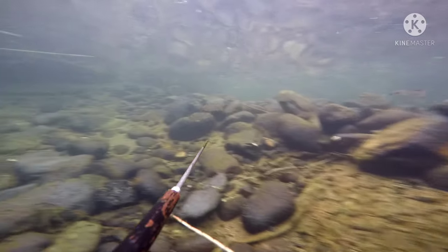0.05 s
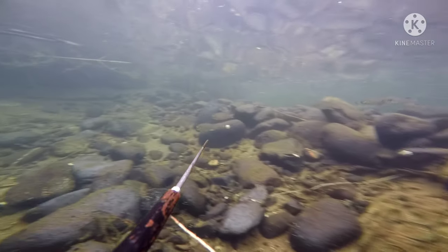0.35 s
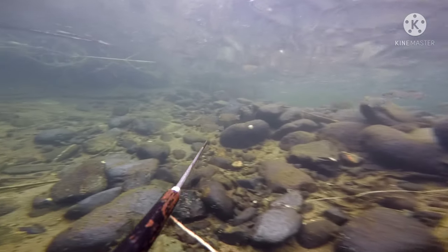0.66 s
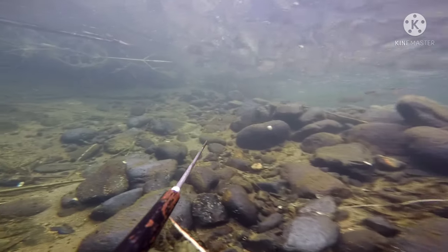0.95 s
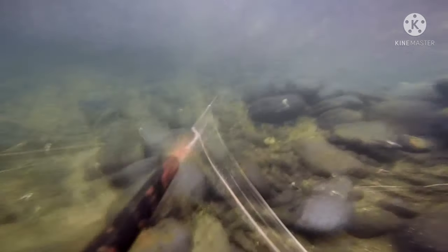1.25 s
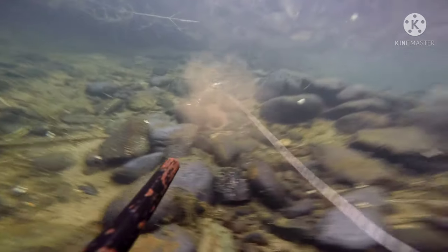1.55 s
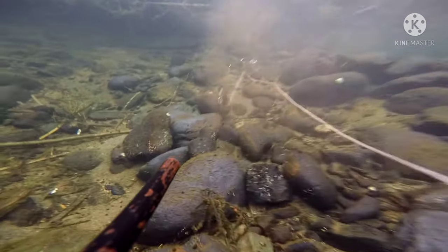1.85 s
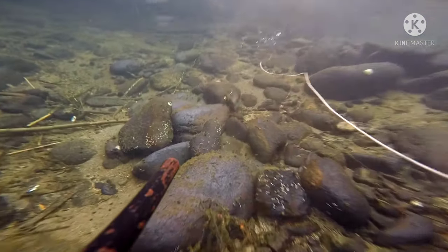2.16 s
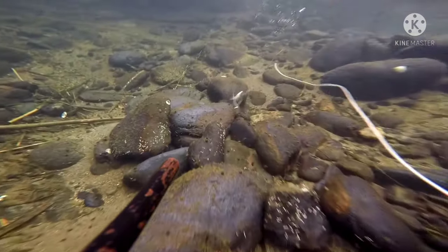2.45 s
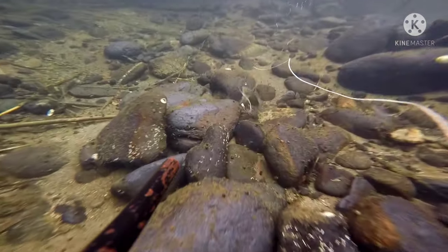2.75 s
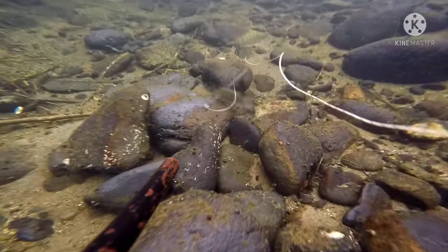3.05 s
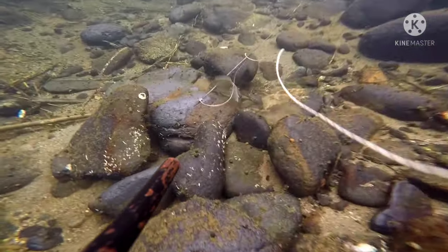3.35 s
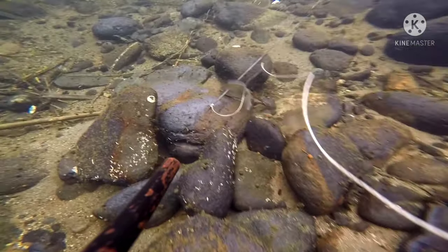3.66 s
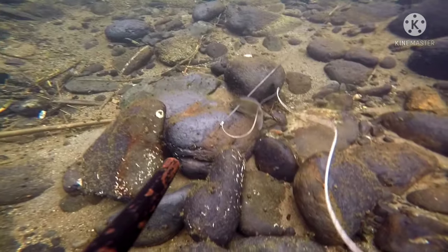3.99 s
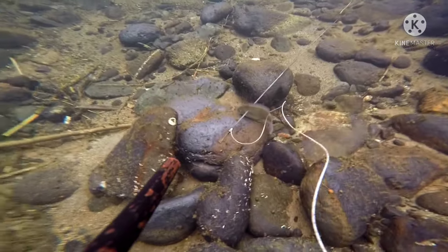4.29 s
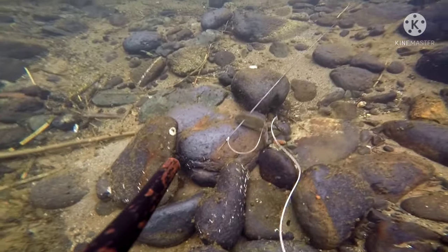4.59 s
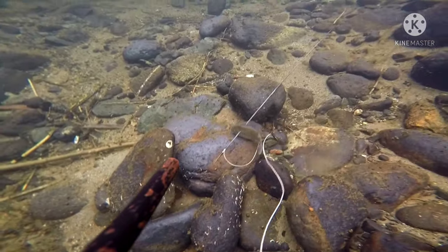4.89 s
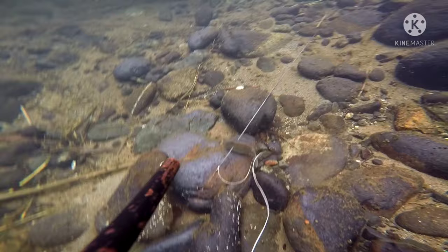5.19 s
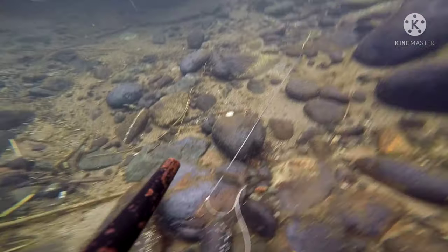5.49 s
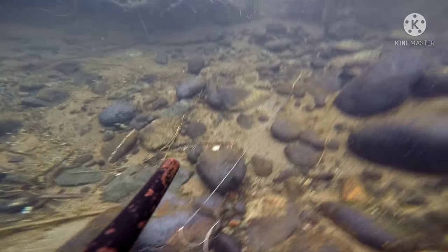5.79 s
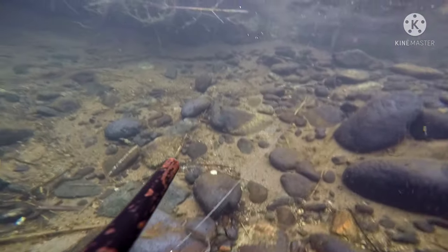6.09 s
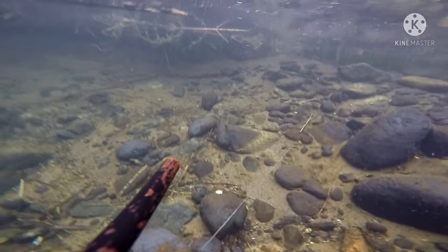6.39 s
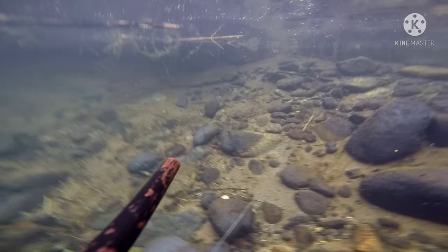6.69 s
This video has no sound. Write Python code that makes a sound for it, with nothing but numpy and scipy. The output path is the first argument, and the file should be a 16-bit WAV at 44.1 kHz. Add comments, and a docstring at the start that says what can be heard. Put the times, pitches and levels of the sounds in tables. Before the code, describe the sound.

A low, lumpy rumble of river current is heard underwater through a housing fixed to a speargun. After a couple of faint ticks, the gun fires with a hard, distorted snap, a heavy kick and a brief low hum. Everything is ducked for a moment. As the water noise swells back, the line taps and drags on the gun, then the knocks thin out among light scratches of grit and sharp little clicks.

```python
"""A speargun fires in a shallow stony river: a burst of hard blows, a heavy kick and a low hum.
Heard through the housing of a camera on the gun, the shot overloads and the gain control ducks
everything, then slowly recovers. The gun sways, the line knocks and drags on it, grit scrapes the
shaft and a few small hard ticks sound in the water. Under it all the current rumbles on the housing."""
import sys
import numpy as np
from scipy import signal
from scipy.fft import rfft, irfft
from scipy.io import wavfile

SR = 44100
rng = np.random.default_rng(int(sys.argv[2]) if len(sys.argv) > 2 else 0)


def file_out(sig):
    """Save sig as 16-bit WAV at sys.argv[1]."""
    # one column per channel
    cols = np.atleast_2d(sig).T
    # limit, then scale
    lim = np.clip(cols, -1, 1)
    pcm = np.round(lim * 32767).astype(np.int16)
    wavfile.write(sys.argv[1], SR, pcm)


N = 301644
TIME = np.arange(N) / SR
SHOT_S, CUTOFF_HZ = 1.333, 15400


# hits of the release, shaft, rubber bands and line running out:
# (time [s], knock peak [dB], ring peak [dB], drag time [s], knock centre [Hz])
SHOT_HITS = [(1.333, 23.5, 26.6, 0.00097, 660), (1.3338, 35, 27.4, 0.0013, 660),
             (1.3447, 13.5, 27, .0006, 687), (1.3535, 8, 32, .0003, 667), (1.3558, 32, 18.5, 0.0075, 615),
             (1.369, 6.5, 31, 0.0033, 650), (1.374, 14, 34.8, 0.0084, 647), (1.381, 24.5, 21, 0.0052, 650),
             (1.428, -8, 2, 0.00083, 680)]

def shot():
    """The gun fires: a tight cluster of choked hits over the kick and its hum."""
    return recoil() + hum() + contacts(SHOT_HITS, knock_damping=8, ring_damping=10.2,
                                       slip_db=2, grit_db=-9, slips_per_s=7000)


def recoil(level_db=36, start_hz=46, end_hz=22, settle_s=0.04, t60=0.39, rise_s=0.0045):
    """The kick shakes the gun heavily: a sub thump that drops in pitch as it dies."""
    t = np.maximum(TIME - SHOT_S, 0)
    cycles = end_hz * t + (start_hz - end_hz) * settle_s * (1 - np.exp(-t / settle_s))
    swell = 1 - np.exp(-(t / rise_s) ** 2)   # the gun's mass moves only after the first crack
    return from_db(level_db) * swell * np.sin(2 * np.pi * cycles) * from_db(-60 * t / t60)


# low hum of gun and slack bands, thin zing of the shaft: (pitch [Hz], level [dB], t60 [s])
HUM_MODES = [(70, 10, 0.6), (94.6, 14.5, 0.33), (133.4, -3.5, 0.2), (180, 7, 0.37), (7200, -1.5, 0.2)]

def hum():
    """The kick leaves the gun, its bands and the shaft ringing."""
    kick = np.zeros(N)
    kick[round(SHOT_S * SR)] = 1
    return body(kick, HUM_MODES, spread_db=1.5)


# the housing's low knock: (pitch [Hz], relative level [dB], t60 before damping [s])
HOUSING_MODES = [(302, -14, 0.086), (500, -8.5, .04), (591, -2.5, 0.052), (665, 0, 0.08),
                 (754, -2.5, 0.033), (867, -1.5, .03), (913, -1.5, 0.038), (1010, -7, 0.026)]
# the bright ring of gun and shaft: (pitch [Hz], relative level [dB], t60 before damping [s])
GUN_MODES = [(1520, -13, 0.009), (1476, -8, 0.051), (1815, -10.5, 0.082), (1921, -12, 0.18),
             (2160, -4, 0.057), (2480, -6, 0.072), (2435, 2.5, 0.062), (2720, 0, 0.036), (2980, 4.5, 0.048),
             (3220, -15, 0.036), (3600, -14, 0.034), (4097, -10, 0.094), (4590, -10, 0.054),
             (4874, -20, 0.1), (5420, -17, 0.092), (7800, -28, .06), (8300, -17.5, 0.051),
             (9300, -23.5, 0.024)]

def contacts(hits, knock_damping, ring_damping, slip_db, grit_db, slips_per_s, detune=.012):
    """Each hit is a blow trailed by tiny dying slips; it sounds both housing and gun."""
    out, t = np.zeros(N), TIME[:SR // 4]
    for start, knock_db, ring_db, drag_s, centre_hz in hits:
        force = from_db(slip_db) * grains(len(t), slips_per_s) * np.exp(-t / drag_s)
        force[0] = 1   # the blow itself
        # where it lands favours the low modes near its centre; the grip detunes the high ones a little
        low_modes = [(hz, db - 95 * np.log2(hz / centre_hz) ** 2, t60) for hz, db, t60 in HOUSING_MODES]
        high_modes = [(hz * (1 + detune * rng.standard_normal()), db, t60) for hz, db, t60 in GUN_MODES]
        knock = peak_one(cut(body(force, low_modes, knock_damping), centre_hz / 2, "high"))
        ringing = peak_one(body(force, high_modes, ring_damping))
        grit = from_db(grit_db) * peak_one(cut(force, 1500, "high"))
        add(out, start, from_db(knock_db) * knock + from_db(ring_db) * peak_one(ringing + grit))
    return out


# line and fittings knocking on the gun:
# (time [s], knock peak [dB], ring peak [dB], drag time [s], knock centre [Hz])
LINE_HITS = [(1.144, -43, -33.5, .008, 810), (1.1983, -29, -30.5, .005, 895), (1.457, -11, -7, .014, 703),
             (1.529, 3.5, -7.5, 0.0098, 690), (1.578, -10, -12.5, 0.028, 660), (1.632, -7, -25, .014, 355),
             (1.673, -8, -10.5, .006, 900), (1.726, -11.5, -13.5, 0.014, 930), (1.91, -15, -18, 0.03, 682),
             (1.972, -12, -20.5, 0.029, 708), (2.05, -26, -46, .008, 500),
             (2.095, -28.5, -27.5, 0.014, 720), (2.2295, -26, -17.5, 0.026, 663),
             (2.3445, -15, -17, .016, 666), (2.372, -12, -38, 0.011, 690), (2.4085, -4, -8.5, 0.0027, 823),
             (2.468, -16.5, -23.5, 0.031, 696), (2.588, -22, -22.5, 0.029, 696),
             (2.7215, -13, -15.5, .0067, 686), (2.734, -5.5, -12.5, 0.017, 664),
             (2.776, -11, -15.5, 0.026, 724), (2.923, -18, -31, .006, 710), (2.996, -17, -21.5, 0.017, 690),
             (3.033, -16, -20, 0.009, 680), (3.107, -15, -23.5, 0.0051, 700), (4.332, -35, -51, .003, 665),
             (4.5175, -22, -33, .019, 690), (4.9215, -24, -38, .0063, 710),
             (5.2965, -13.5, -45, .0037, 627), (5.3105, -7, -27.5, 0.0021, 646),
             (5.526, -14.5, -25, 0.011, 660), (5.564, -16, -26, 0.0022, 730), (6.76, -19, -49, .014, 328),
             (6.806, -18, -42, .0097, 573)]

def line_knocks():
    """The line and its fittings strike the gun and let it ring openly."""
    return contacts(LINE_HITS + rebounds(LINE_HITS), knock_damping=1.1, ring_damping=1.1,
                    slip_db=-12, grit_db=-5, slips_per_s=2400)


def rebounds(hits, delay_s=0.053, jitter=.25, softer_db=14, touch_drag_s=0.021):
    """The slack line falls back once after each hit: a faint touch, stronger after a long drag."""
    delays = delay_s * np.exp(jitter * rng.standard_normal(len(hits)))
    touches = []
    for (start, knock_db, ring_db, drag_s, centre_hz), delay in zip(hits, delays):
        loss_db = softer_db - 10 * np.log10(drag_s / touch_drag_s)
        touches.append((start + drag_s + delay, knock_db - loss_db, ring_db - loss_db,
                        touch_drag_s, centre_hz))
    return touches


# line and hand sliding along the gun:
# (time [s], length [s], level [dB], fade [dB/s], housing ring against the rasp [dB])
SLIDES = [(1.394, 0.394, -25.5, 49, 13.5), (2.218, 0.28, -48.5, 7, 18), (2.72, 0.18, -45, 48, 5),
          (2.984, 0.23, -44, 28, 8), (5.516, 0.176, -53.5, 24, 14), (6.691, 0.13, -42.5, 5, 1)]

def rubbing(friction_db=3, band_hz=(650, 2900), attack_s=0.014, release_s=0.042, uneven_db=2.5):
    """Grainy, uneven friction rasps and keeps the modes sounding; each slide bites, fades and lets go."""
    friction = cut(grains(N, per_s=2500), band_hz[1], "low", order=6)
    friction = cut(friction, band_hz[0], "high")
    gun_ring = rms_one(body(friction, GUN_MODES, damping=1.9, spread_db=0))
    rasp = gun_ring + from_db(friction_db) * rms_one(friction)
    housing_ring = rms_one(body(friction, HOUSING_MODES, damping=1.2, spread_db=4))
    out = np.zeros(N)
    for start, length, db, fade_db_per_s, housing_db in SLIDES:
        t = TIME - start
        stroke = np.clip(np.minimum(t / attack_s, 1 + (length - t) / release_s), 0, 1)
        level = from_db(db - fade_db_per_s * np.clip(t, 0, length))
        out += stroke * level * (rasp + from_db(housing_db) * housing_ring)
    return out * from_db(uneven_db * drift(rate_hz=35))


# grit on the shaft: (time [s], level [dB], length [s])
GRIT_SCRAPES = [(2.73, -21, 0.0084), (2.786, -37, .03), (2.852, -39.5, 0.06), (4.512, -45, .018),
                (5.369, -39.5, 0.0076), (5.481, -43, .012), (5.572, -34.5, 0.0085)]

def scrapes(low_cut_hz=3600):
    """Sand grains crack against the shaft in short bright swells."""
    out = np.zeros(N)
    for start, db, length in GRIT_SCRAPES:
        swell = np.hanning(int(length * SR))
        add(out, start, from_db(db) * swell * rms_one(grains(len(swell), per_s=5000)))
    return cut(out, low_cut_hz, "high")


# jolts that set the gun swaying in the hand: (time [s], level [dB], pitch [Hz], t60 [s])
JOLTS = [(1.243, -14.5, 20.8, 1), (6.467, -9, 32.4, 0.9), (6.596, -8.5, 27.2, 0.15)]

def sways():
    """The swinging gun pushes water against the housing: a dying sub wobble."""
    out, t = np.zeros(N), TIME[:SR]
    for start, db, hz, t60 in JOLTS:
        add(out, start, from_db(db) * np.sin(2 * np.pi * hz * t) * from_db(-60 * t / t60))
    return out


# small hard ticks: (time [s], level [dB], pitch [Hz], t60 [s], hardness as crack against tone [dB])
WATER_TICKS = [(.3517, -30, 2590, 0.016, -14), (0.786, -22.5, 3780, 0.02, -23),
               (2.157, -23, 3350, 0.012, -20), (3.9531, -28, 14000, 0.0034, -10),
               (4.548, -21, 3260, 0.02, -24), (5.121, -21, 3860, 0.0019, -18),
               (6.0434, -8, 2980, 0.021, -6.5)]
# partials of a tick: (multiple of its pitch [ratio], relative level [dB])
TICK_PARTIALS = [(.76, -11), (1, 4.5), (1.35, -2.5), (1.6, -3), (1.85, -4)]

def ticks(crack_s=0.0018, partials_follow=0.6):
    """A tiny crack and a few fast-dying modes; a soft tick rings with little but its main mode."""
    out, t = np.zeros(N), TIME[:SR // 10]
    click = signal.unit_impulse(len(t))
    for start, db, hz, t60, hardness_db in WATER_TICKS:
        crack = cut(rng.standard_normal(len(t)), 1350, "high") * np.exp(-t / crack_s)
        crack = peak_one(cut(crack, 4200, "low", order=1))
        modes = [(hz * ratio, partial_db + partials_follow * hardness_db * (ratio != 1), t60 / ratio)
                 for ratio, partial_db in TICK_PARTIALS if hz * ratio < CUTOFF_HZ]
        tone = peak_one(body(click, modes, spread_db=1.5))
        add(out, start, from_db(db) * (tone + from_db(hardness_db) * crack))
    return out


# tone curve of the current on the housing: (frequency [Hz], relative level [dB])
CURRENT_SPECTRUM = [(9, -30), (18, -2), (30, 3.5), (45, -1), (92, -6.5), (177, -13), (314, -19.5),
                    (600, -25), (960, -30), (1910, -36.5), (3790, -43), (7000, -53.5), (12000, -57),
                    (15000, -58.5)]
# how hard the water buffets the housing as the diver drifts: (time [s], level [dB])
RUMBLE_LEVELS = [(0, -25), (1.1, -23.5), (2.7, -26), (5.3, -25), (5.9, -28), (6.7, -24)]

def current(split_hz=200, lumpy_db=1.55, rush_db=-35.5):
    """The bed: eddies on the housing make a lumpy rumble under a smooth, steady rush."""
    hz, db = np.transpose(CURRENT_SPECTRUM)
    bins_hz = np.maximum(np.fft.rfftfreq(N, 1 / SR), 1)
    flow = rfft(rng.standard_normal(N)) * from_db(np.interp(np.log(bins_hz), np.log(hz), db))
    low_share = 1 / (1 + (bins_hz / split_hz) ** 4)
    rumble = rms_one(irfft(flow * low_share, N))
    rush = rms_one(irfft(flow * (1 - low_share), N))
    rumble_db = np.interp(TIME, *np.transpose(RUMBLE_LEVELS)) + lumpy_db * drift(rate_hz=9)
    return from_db(rumble_db) * rumble + from_db(rush_db) * rush


def body(force, modes, damping=1, spread_db=2.5):
    """All modes answer a force, each at a slightly random strength, as if struck in a new spot."""
    return sum((-1) ** k * from_db(db + spread_db * rng.standard_normal()) * ring(force, hz, t60 / damping)
               for k, (hz, db, t60) in enumerate(modes))


def ring(force, hz, t60):
    """One mode: a unit click sets off a dying sine of height 1."""
    decay, angle = from_db(-60 / (t60 * SR)), 2 * np.pi * hz / SR
    return signal.lfilter([0, np.sin(angle)], [1, -2 * decay * np.cos(angle), decay ** 2], force + 1e-18)


def grains(samples, per_s):
    """A crackle of randomly scattered clicks."""
    return rng.standard_normal(samples) * (rng.random(samples) < per_s / SR)


def drift(rate_hz):
    """A slow random wobble of spread 1."""
    return rms_one(cut(rng.standard_normal(N + SR), rate_hz, "low")[SR:])


def cut(x, hz, kind, order=2):
    """Butterworth low- or high-pass."""
    return signal.sosfilt(signal.butter(order, hz, kind, fs=SR, output="sos"), x)


def add(out, start_s, sound):
    """Drop a short sound into the mix."""
    i = round(start_s * SR)
    out[i:i + len(sound)] += sound[:max(N - i, 0)]


def from_db(db):
    return 10 ** (np.asarray(db) / 20)


def rms_one(x):
    return x / np.sqrt(np.mean(x ** 2) + 1e-20)


def peak_one(x):
    return x / (np.abs(x).max() + 1e-20)


def scene():
    """Everything reaches the one microphone through the housing."""
    water = current() + sways()
    return (water + shot() + line_knocks() + scrapes() + ticks() + rubbing())[None]


def gain_control(x, deepest_db=-32.5, attack_s=.0125, recovery_db_per_s=16):
    """Overload ducks the gain, which climbs back steadily; gives the gain and its brief dip envelope."""
    wanted_db = np.clip(-20 * np.log10(np.abs(x) + 1e-9), deepest_db, 0)
    climb_db = recovery_db_per_s * TIME
    held_db = np.minimum.accumulate(wanted_db - climb_db) + climb_db
    lag = np.exp(-1 / (attack_s * SR))
    gain_db = signal.lfilter([1 - lag], [1, -lag], held_db)
    since_overload = TIME - TIME[np.argmax(wanted_db < deepest_db / 2)]
    dip_onset_s, dip_end_s = 0.16, .705
    dip = np.clip(np.minimum(since_overload / dip_onset_s, (dip_end_s - since_overload) / attack_s), 0, 1)
    return from_db(gain_db), dip


def record(dry, bass_hz=93, dip_db=-7, dip_hiss_db=-40, floor_hiss_db=-79.5, treble_hz=9500):
    """Gain control, hiss and hard clipping, then a softened treble and a steep top cut."""
    x = dry[0]
    hiss = rms_one(cut(rng.standard_normal(N), 6400, "low", order=1))
    gain, dip = gain_control(x)
    # just after the heavy overload all but the bass dips further and hiss comes through
    bass = cut(x, bass_hz, "low", order=1)
    x = bass + from_db(dip_db * dip) * (x - bass) + from_db(dip_hiss_db) * dip * hiss
    x = gain * x + from_db(floor_hiss_db) * hiss
    oversampled = signal.resample_poly(x, 4, 1)
    x = signal.resample_poly(np.clip(oversampled, -.98, .98), 1, 4)
    x = cut(x, treble_hz, "low", order=1)
    return cut(x, CUTOFF_HZ, "low", order=16)[None]


dry = scene()
out = record(dry)
file_out(out)
```